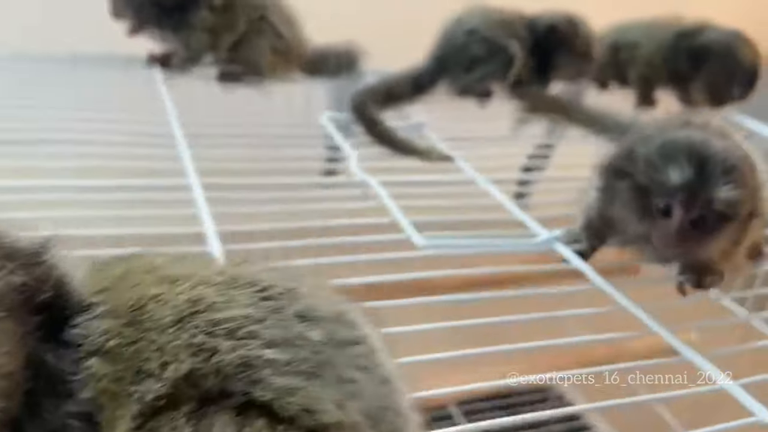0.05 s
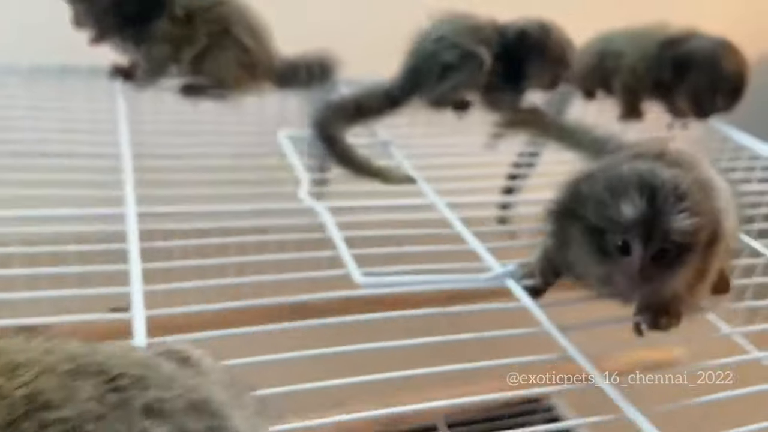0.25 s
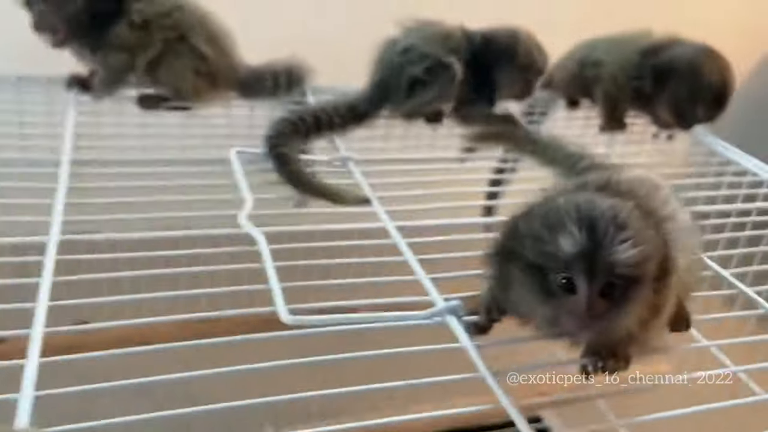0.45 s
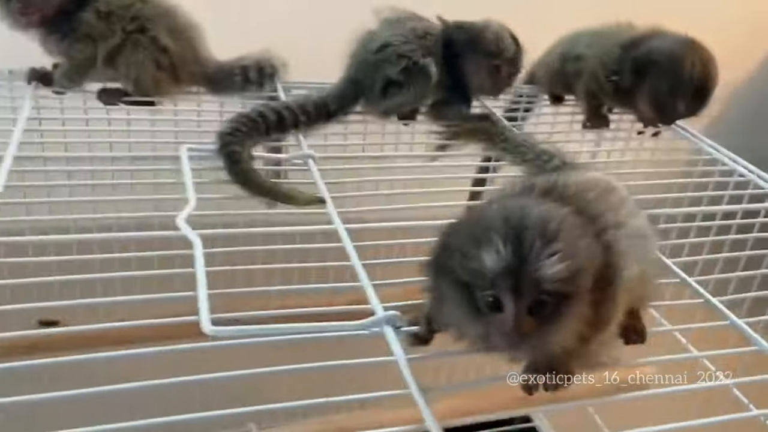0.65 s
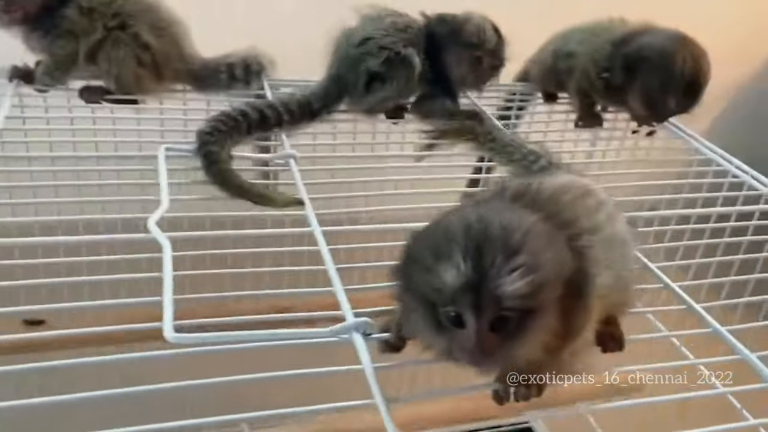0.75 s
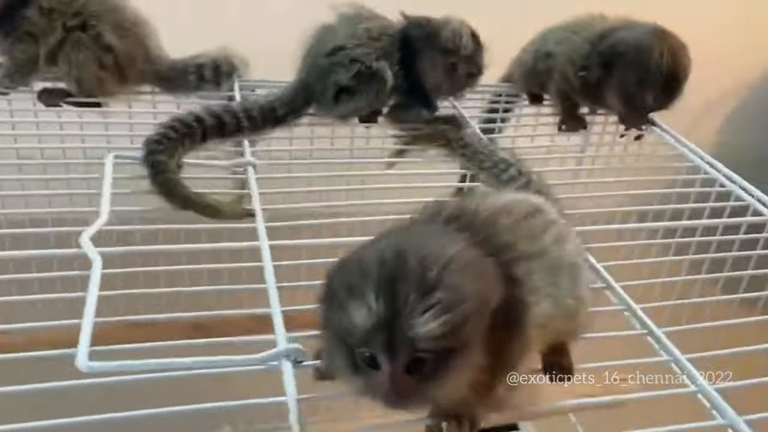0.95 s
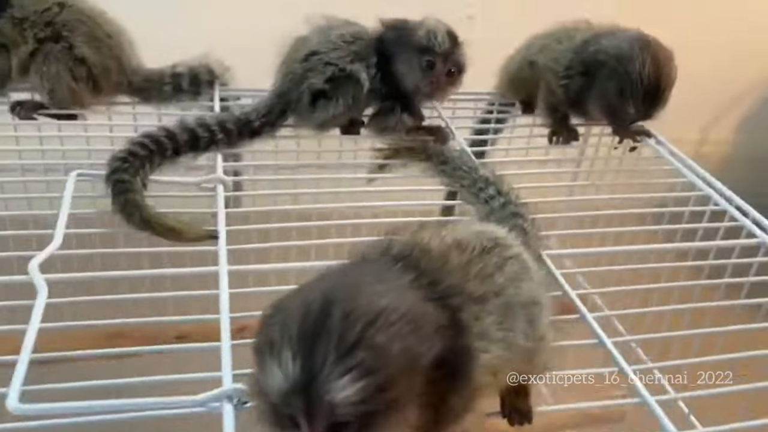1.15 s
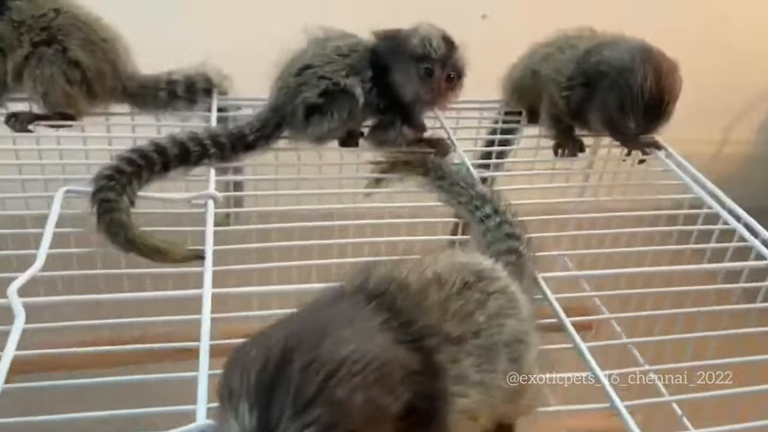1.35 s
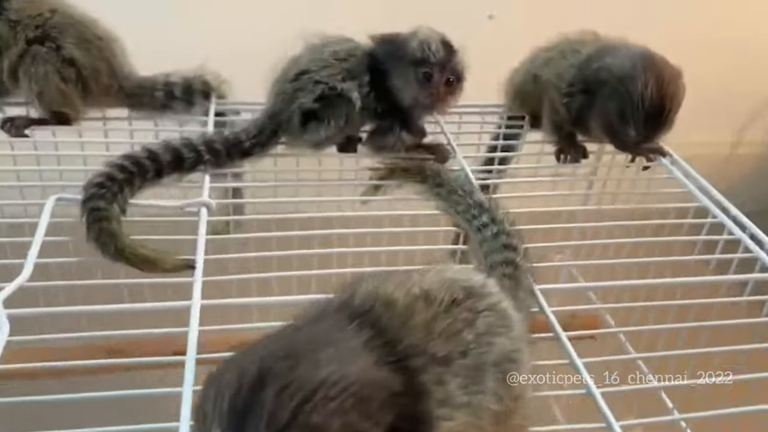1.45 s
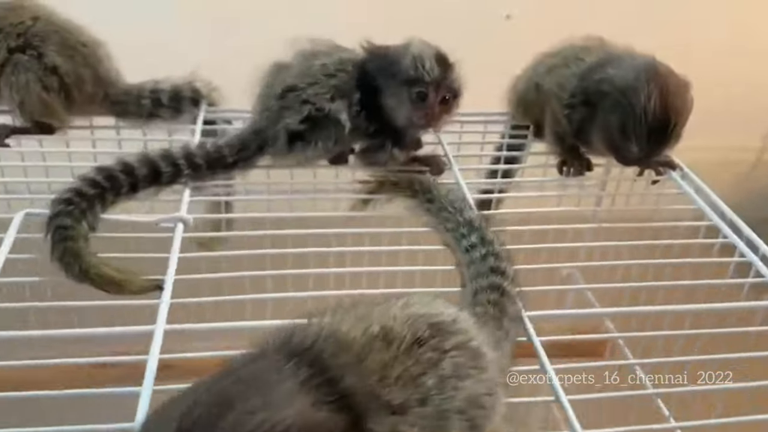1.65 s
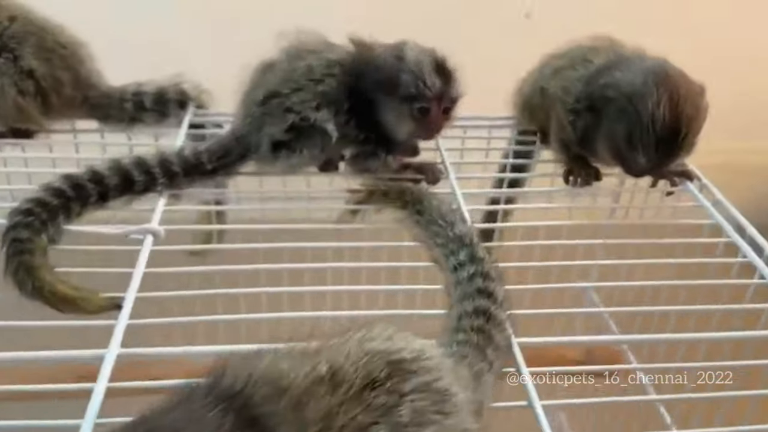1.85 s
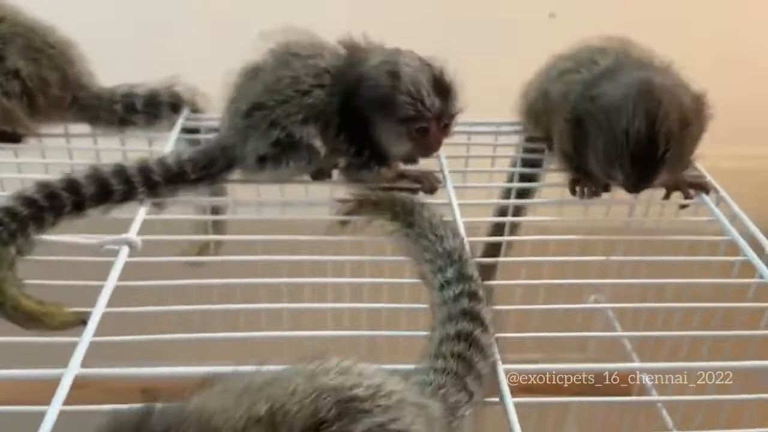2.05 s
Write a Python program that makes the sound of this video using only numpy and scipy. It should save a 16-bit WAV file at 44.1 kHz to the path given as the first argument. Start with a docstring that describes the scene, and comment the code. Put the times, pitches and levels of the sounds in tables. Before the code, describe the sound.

Small monkeys call shrilly: a harsh buzzing cry, piercing chirps, peeps and a wavering falling trill indoors

```python
"""A small room: marmosets on a wire cage, close to the microphone.
One gives a harsh buzzing cry: throat-shaped harmonics of a pulse rate, plus pulsed breath noise.
Others answer with high trills, short peeps and sharp plunging chirps: wavering tones, noise-broken when hoarse.
Feet bump the cage softly (decaying low modes) and claws scratch it (noise bursts), over quiet coloured noise."""
import sys
import numpy as np
from scipy import signal
from scipy.fft import rfft, irfft, next_fast_len
from scipy.io import wavfile
from scipy.ndimage import uniform_filter1d, map_coordinates

SR = 44100
rng = np.random.default_rng(int(sys.argv[2]) if len(sys.argv) > 2 else 0)


def wav_out(sig):
    """Save sig, one row per channel (or a flat mono array), as 16-bit PCM at SR to the path in sys.argv[1]."""
    wavfile.write(sys.argv[1], SR, np.round(np.clip(np.atleast_2d(sig).T, -1, 1) * 32767).astype(np.int16))


N = 92610

TOP_HZ = 15750  # band limit
OVERTONE_DB = -28  # octave overtone of trills and peeps


def amp(db):
    """Decibels to gain."""
    return 10 ** (np.asarray(db) / 20)


def unit(x):
    """Scale to rms 1."""
    return x / np.sqrt(np.mean(x ** 2) + 1e-20)


def along(points, hz):
    """Interpolate (frequency [Hz], value) points on a log-frequency axis."""
    point_hz, values = np.transpose(points)
    return np.interp(np.log(hz + 1), np.log(point_hz + 1), values)


def clock():
    """Time of every sample [s]."""
    return np.arange(N) / SR


def curves(rows):
    """A gate over the call, then a curve per column, each smoothed so that level jumps do not click."""
    smoothing_s = 0.0015
    knot_s, *columns = np.transpose(rows)
    knot_s, t = np.sort(knot_s), clock()
    gate = 1.0 * (t >= knot_s[0]) * (t <= knot_s[-1])
    controls = [gate] + [np.interp(t, knot_s, column) for column in columns]
    return uniform_filter1d(np.array(controls), int(smoothing_s * SR), axis=1)


def wobble(rate):
    """Smooth random curve, rate knots per second."""
    knots = rng.standard_normal(N // 4)
    return map_coordinates(knots, [clock() * rate], mode="wrap")


def filtered(x, response):
    """Multiply the spectrum of x by a response of frequency, zero-padded against wrap-around."""
    size = next_fast_len(N + SR // 4)
    spectrum = rfft(x, size) * response(np.fft.rfftfreq(size, 1 / SR))
    return irfft(spectrum, size)[..., :N]


def noise(colour):
    """Noise of rms 1, coloured by (frequency [Hz], level [dB]) points."""
    return unit(filtered(rng.standard_normal(N), lambda hz: amp(along(colour, hz))))


def burst(start_s, length_s, edge_s):
    """Flat envelope with linear edges."""
    t = clock() - start_s
    rise = np.clip(t / edge_s, 0, 1)
    fall = np.clip((length_s - t) / edge_s + 1, 0, 1)
    return rise * fall


def in_room(x, wet_db):
    """Direct sound, early bounces off cage and walls, and a short tail of frequency-dependent decay."""
    walls_s, walls_db, bounces = 0.018, -1, 10  # latest bounce, their summed level
    width = 0.62  # side share of the tail
    # reverberation time: (frequency [Hz], t60 [s])
    room_t60 = [(500, 0.97), (4000, 0.4), (8000, 0.38), (13000, 0.31), (15000, 0.23)]
    hz, t, z = signal.stft(rng.standard_normal((2, SR // 2)), SR, nperseg=256)
    decay = amp(-60 * t / along(room_t60, hz)[:, None])
    tail = signal.istft(z * decay, SR, nperseg=256)[1]
    tail /= np.linalg.norm(tail[0])
    for channel in tail:
        delays = (rng.uniform(0.1, 1, size=bounces) * walls_s * SR).astype(int)
        channel[delays] += amp(walls_db) * rng.choice([-1, 1], size=bounces) / np.sqrt(bounces)
    mid, side = amp(wet_db) * signal.fftconvolve(x[None], tail, axes=1)[:, :N]
    return (x + mid + width * np.array([side, -side])) / np.sqrt(1 + amp(2 * wet_db))


def whistle(pitch_hz, hoarse, overtone_db):
    """A pure wavering voice with an octave overtone; when hoarse, a sharp-edged noise band around its pitch."""
    half_width_hz = 889  # of the hoarse band
    waver_hz, waver_rate = 51.3, 630  # rms at the knots, knots per second
    hz = pitch_hz + waver_hz * wobble(waver_rate)
    phase = 2 * np.pi * np.cumsum(hz) / SR
    low_noise = filtered(rng.standard_normal((2, N)), lambda f: 1 / (1 + (f / half_width_hz) ** 20))
    real, imaginary = unit(low_noise)
    hoarse = np.clip(hoarse, 0, 1)
    flutter = np.sqrt(1 - hoarse) + np.sqrt(hoarse / 2) * (real + 1j * imaginary)
    below_top = np.clip((TOP_HZ - 2 * hz) / 1000, 0, 1)  # fade the overtone out at the band limit
    overtone = amp(overtone_db) * below_top * np.exp(2j * phase)
    return np.sqrt(2) * np.real(flutter * (np.exp(1j * phase) + overtone))


def cry():
    """Nearly even pulses, as harmonics, ring the throat, with a rasp of air at each pulse."""
    jitter, scatter_db, wander_db = 0.0012, 0.7, 5.5  # rate (relative), overall level, each partial
    rasp_db, wet_db = -4.5, -7
    # the cry: (time [s], pulse rate [Hz], level [dB])
    contour = [(0, 513.5, -41), (.026, 505, -33), (.128, 493.9, -36), (.16, 491.8, -33.5), (.198, 472, -34),
               (.22, 469.8, -37.5), (.275, 471, -40.5), (.338, 463.9, -40.5), (.436, 474, -32.5),
               (.478, 493.8, -31.5), (.53, 487.6, -38.5), (.555, 482.5, -35.5), (.58, 465, -55.5),
               (.6, 450, -96)]
    # throat resonances: (frequency [Hz], relative level [dB])
    throat = [(500, -27.5), (1000, -24.5), (1500, -33), (2400, -26.5), (3100, -47), (3600, -19.5),
              (4100, -20), (5000, -6), (5700, -9.5), (7000, 0.5), (8500, -6), (10000, 2), (11000, -6),
              (12500, -0.5), (14000, 6.5), (15000, -5.5), (16000, -24.5)]
    # breath band: (frequency [Hz], relative level [dB])
    breath = [(4000, -64.5), (6500, -31.5), (7400, -27.5), (8400, -12), (9500, -28), (11000, -37),
              (13500, -29.5), (16000, -35.5)]
    gate, rate_hz, level_db = curves(contour)
    phase = 2 * np.pi * np.cumsum(rate_hz * (1 + jitter * wobble(300))) / SR
    buzz = 0
    for k in range(1, 34):
        partial_db = along(throat, k * rate_hz) + wander_db * wobble(14.33)
        buzz = buzz + amp(partial_db) * np.sin(k * phase + rng.uniform(0, np.pi))
    buzz = unit(buzz * amp(scatter_db * wobble(400)))
    rasp = unit(noise(breath) * (1 + 0.5 * np.cos(phase)))
    voice = unit(buzz + amp(rasp_db) * rasp)
    return in_room(gate * amp(level_db) * voice, wet_db)


def trills():
    """Whistles that start hoarse and clear up; pitch swings some twenty times a second round a sinking centre."""
    upper_hz, upper_follows, upper_db = 14400, 0.5, -13  # faint second whistle, follows half the pitch change
    # each trill: (time [s], centre pitch [Hz], full swing [Hz], level [dB], hoarseness [clipped to 0-1])
    falling_trill = [(0.924, 8900, 100, -66, 1.2), (.929, 9080, 99, -42, 0.8), (0.986, 9110, 297, -32, 0.7),
                     (1.021, 8655, 665, -36, 0.8), (1.098, 8340, 858, -37.5, 0.55),
                     (1.133, 7920, 910, -40.5, 0.19), (1.152, 7580, 876, -50, 0),
                     (1.241, 7260, 926, -49, 0.18), (1.322, 6890, 980, -57, 0),
                     (1.352, 6400, 863, -52.5, 0), (1.363, 5450, 203, -60, 0.11),
                     (1.366, 5136, 48.5, -46.5, 0.12), (1.384, 4290, 48.2, -52, 0),
                     (1.394, 3720, 48.9, -60.5, 0.19)]
    late_trill = [(1.832, 9000, 600, -56, .9), (1.86, 8870, 700, -44.5, .9),
                  (1.925, 7940, 700, -46.5, 0.44), (1.978, 7575, 700, -47.5, 0.046),
                  (2.026, 7550, 700, -49, 0.024), (2.046, 7240, 700, -44, 0.069),
                  (2.065, 7430, 650, -39.5, 0.0071), (2.1, 7080, 200, -49, 0.014)]
    # per trill: (time of a trough [s], vibrato rate there [Hz], slowing [Hz/s], room level [dB])
    vibrato = [(1.142, 23.67, 9.5, -8.5), (1.976, 21.12, 3, -10.5)]
    out = 0
    for rows, (trough_s, rate_hz, slowing, wet_db) in zip((falling_trill, late_trill), vibrato):
        gate, centre_hz, swing_hz, level_db, hoarse = curves(rows)
        t = clock() - trough_s
        swing = -np.cos(2 * np.pi * (rate_hz * t - slowing * t ** 2 / 2))
        pitch_hz = centre_hz + swing_hz * swing * (1 - 0.4 * hoarse)  # hoarseness narrows the swing
        voice = whistle(pitch_hz, hoarse * (1 + 0.5 * swing), OVERTONE_DB)
        upper = whistle(upper_hz + upper_follows * (pitch_hz - 7000), hoarse, OVERTONE_DB)
        upper = amp(upper_db) * upper * np.clip(1 - 1.5 * hoarse, 0, 1)
        out = out + in_room(gate * amp(level_db) * (voice + upper), wet_db)
    return out


def chirps():
    """A very high note plunges by more than an octave within tens of milliseconds, with a spit of air."""
    hiss_db, hiss_below_hz = -9, 10000  # air fades in as pitch falls below this
    highpass_hz = 3390  # high-pass corner of the chirps
    # each chirp: (time [s], pitch [Hz], level [dB], hoarseness [0-1])
    near_chirp = [(0.206, 13200, -46.5, .6), (0.211, 13200, -21.5, 0.8), (0.232, 13170, -24.5, 0.8),
                  (0.236, 13600, -5.5, 0.05), (0.242, 13400, -14.5, 0.6), (0.2537, 13500, -13.5, 0.6),
                  (0.2535, 10910, -30, 0.2), (0.2537, 8360, -17, 0.4), (0.258, 7400, -19, 0.5),
                  (0.26, 5540, -38, 0.14), (.265, 4410, -32.5, 0), (.268, 3700, -69, 0.1)]
    low_chirp = [(1.55, 10070, -56, 0.72), (1.555, 9700, -36, 1), (1.562, 8800, -35, .9),
                 (1.57, 8310, -37, 0.67), (1.572, 7190, -24.5, 0.087), (1.577, 6060, -33.5, 0.82),
                 (1.582, 4650, -39, 0.33), (1.587, 3450, -44, 1)]  # lower, more reverberant
    late_chirp = [(1.783, 13160, -51, 1), (1.789, 13310, -39, .9), (1.807, 13350, -35, 1),
                  (1.813, 13430, -25.5, 0.9), (1.821, 13200, -35.5, 0.46), (1.825, 9600, -24, .7),
                  (1.833, 7300, -28.5, 0.52), (1.837, 4360, -33.5, 0.1), (1.845, 3800, -67, 0.42)]
    # per chirp: (room level [dB], overtone level [dB], left over right [dB])
    chirp_tone = [(-17, -15, -1.5), (-4, -5, 1), (-4, -15, -.5)]
    # air in the plunge: (frequency [Hz], relative level [dB])
    hiss = [(2000, -48.5), (3000, -25.5), (4000, -14.5), (7000, -12.5), (10000, 11), (13000, 8.5),
            (15000, -11)]
    out = 0
    for rows, (wet_db, overtone_db, pan_db) in zip((near_chirp, low_chirp, late_chirp), chirp_tone):
        gate, pitch_hz, level_db, hoarse = curves(rows)
        spit = amp(hiss_db) * noise(hiss) * np.clip((hiss_below_hz - pitch_hz) / 2000, 0, 1)
        voice = gate * amp(level_db) * (whistle(pitch_hz, hoarse, overtone_db) + spit)
        out = out + in_room(voice, wet_db) * amp([[pan_db / 2], [-pan_db / 2]])
    return filtered(out, lambda hz: 1 - 1 / (1 + (hz / highpass_hz) ** 10))


def peeps():
    """Short whistled notes on linear pitch glides; a quick run of them makes a twitter."""
    edge_s, wet_db = 0.0021, -13
    # (start [s], length [s], start pitch [Hz], end pitch [Hz], level [dB], hoarseness [0-1])
    notes = [(0.236, 0.021, 9780, 9400, -25, 0.77), (0.441, 0.048, 10150, 9930, -34, 0),
             (0.471, 0.075, 10130, 9895, -30, 0.1), (0.484, 0.024, 9974, 10050, -24.5, 0.1),
             (0.531, 0.03, 9880, 9080, -27.5, 0.9), (0.577, 0.027, 9730, 9650, -26.5, 0.9),
             (0.598, 0.026, 11300, 12300, -44.5, .95), (.625, 0.023, 9600, 9710, -25.5, 1),
             (0.65, 0.019, 10250, 12120, -38, 0.7), (0.668, 0.024, 8960, 8380, -30, .7),
             (0.696, 0.019, 8190, 7960, -29.5, 0.04), (1.36, 0.034, 10500, 8260, -52, 0.54),
             (1.529, 0.038, 9600, 9500, -56.5, 0.42), (1.577, 0.0054, 7280, 6920, -29, 0.3),
             (1.718, 0.032, 8600, 8570, -52, .2), (1.738, 0.025, 8300, 8540, -42, 0.34),
             (1.752, .028, 8390, 8800, -35.5, 0.09), (1.782, 0.04, 8670, 8240, -41, 0.5),
             (1.893, .08, 9130, 8860, -45.5, 0.9), (2.028, 0.031, 9800, 10000, -57, 0.1),
             (2.062, 0.035, 9850, 9640, -43.5, 0.4)]
    out = 0
    for start_s, length_s, start_hz, end_hz, level_db, hoarse in notes:
        pitch_hz = np.interp(clock(), [start_s, start_s + length_s], [start_hz, end_hz])
        envelope = amp(level_db) * burst(start_s, length_s, edge_s)
        out = out + envelope * whistle(pitch_hz, hoarse, OVERTONE_DB)
    return in_room(out, wet_db)


def cage():
    """Soft feet set the cage's low modes ringing, each decaying exponentially; claws scratch the wire as noise."""
    attack_s, side_gain = 0.0084, 0.25  # attack time constant, left-right difference
    # footfalls: (time [s], level [dB])
    steps = [(.085, -46.5), (.108, -43.5), (0.173, -58.5), (.33, -58), (.455, -52), (0.489, -59.5),
             (0.538, -57), (0.672, -61.5), (0.746, -58), (.772, -58.5), (0.798, -61), (0.879, -64.5),
             (1.058, -59), (1.764, -58.5), (1.962, -63)]
    # cage modes: (frequency [Hz], relative level [dB], t60 [s])
    modes = [(60, 3, 0.18), (77.7, -0.5, 0.22), (110.8, -6.5, 0.42), (177, 1, 0.068), (252.2, -0.5, 0.071),
             (322, -3.5, .07)]
    # claw scratches: (start [s], length [s], level [dB])
    scratches = [(0.555, 0.026, -66.5), (0.656, 0.042, -65.5), (0.919, 0.031, -71.5), (1.565, 0.02, -68),
                 (1.822, 0.018, -59)]
    # scratch spectrum: (frequency [Hz], relative level [dB])
    scratch_colour = [(300, 6.5), (1000, 3.5), (2500, -1), (4500, 1), (8000, -4.5), (15000, -16)]
    out = np.zeros((2, N + SR))
    t = np.arange(SR // 3) / SR

    def ring():
        """Sum of decaying modes with random phase and 2.8 dB level scatter."""
        total = 0
        for hz, db, t60_s in modes:
            decay = amp(db + rng.normal(0, 2.8) - 60 * t / t60_s)
            total = total + decay * np.sin(2 * np.pi * (hz * t + rng.random()))
        return total

    for time_s, level_db in steps:
        pair = ring() + side_gain * np.outer([1, -1], ring())
        start = round(time_s * SR)
        out[:, start:start + len(t)] += amp(level_db) * pair * (1 - np.exp(-t / attack_s))
    envelope = sum(amp(db) * burst(start_s, length_s, edge_s=0.0055) for start_s, length_s, db in scratches)
    claws = noise(scratch_colour) * envelope
    return out[:, :N] + in_room(claws, wet_db=-5.5)


def room_tone():
    """Quiet steady air: coloured noise, mid and side balanced for a left-right likeness, highest in the bass."""
    level_db = -66.5
    # air spectrum: (frequency [Hz], relative level [dB])
    air_colour = [(20, -3), (40, 2.5), (70, 8.5), (130, -0.5), (300, -1.5), (700, -2), (1100, -5.5),
                  (3000, -13), (5000, -12.5), (8000, -37), (11000, -15), (15000, -36.5)]
    # left-right likeness: (frequency [Hz], correlation)
    alike = [(50, 0.95), (250, .5), (700, 0.35), (2000, 0.05), (10000, 0.64)]

    def balance(hz):
        """Mid and side gains whose power difference is the correlation."""
        angle = np.arccos(np.clip(along(alike, hz), -1, 1)) / 2
        return np.array([np.cos(angle), np.sin(angle)])

    mid, side = filtered(np.array([noise(air_colour), noise(air_colour)]), balance)
    return amp(level_db) * np.array([mid + side, mid - side])


def scene():
    """All the calls, the cage and the room."""
    return cry() + trills() + chirps() + peeps() + cage() + room_tone()


def record(dry):
    """The microphone has a notch near 11 kHz and a steep band limit."""
    # microphone response: (frequency [Hz], gain [dB])
    mic = [(9000, -0.5), (10200, -2.5), (10800, -9.5), (11500, -1), (12600, 0), (14200, -4), (15000, 4.5),
           (15800, -12.5)]
    return filtered(dry, lambda hz: amp(along(mic, hz)) * (hz < TOP_HZ))


dry = scene()
out = record(dry)
wav_out(out)
```